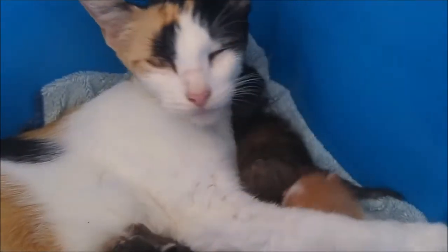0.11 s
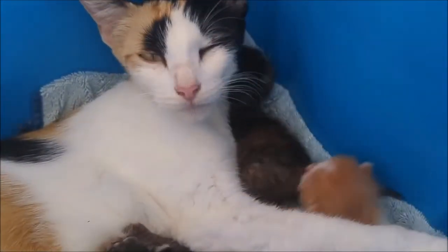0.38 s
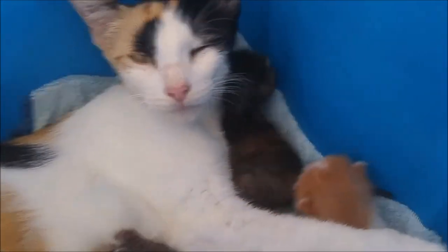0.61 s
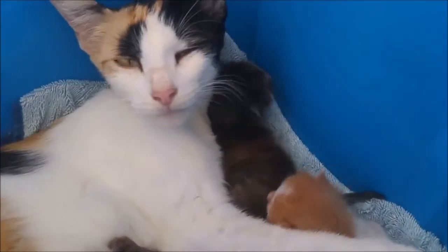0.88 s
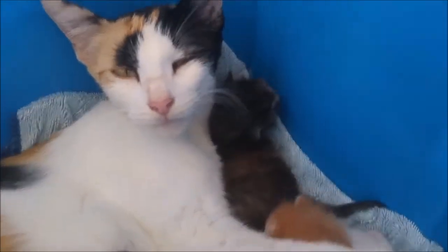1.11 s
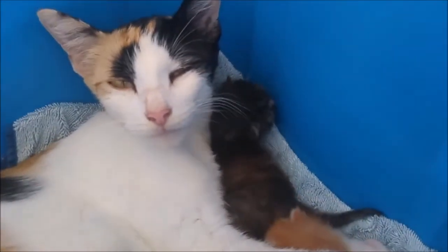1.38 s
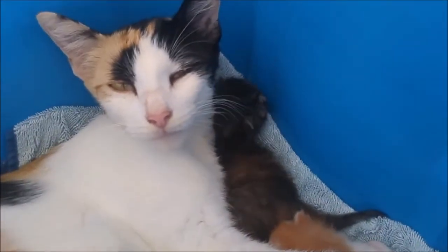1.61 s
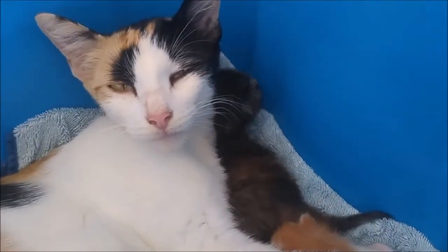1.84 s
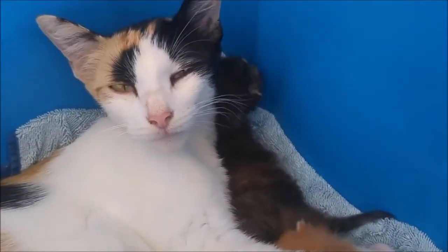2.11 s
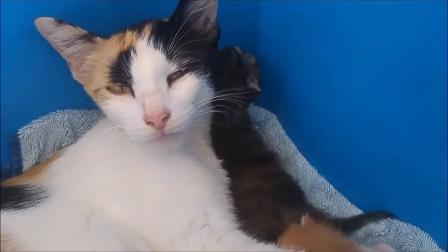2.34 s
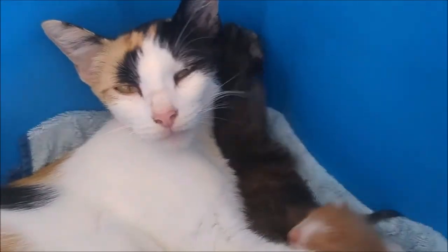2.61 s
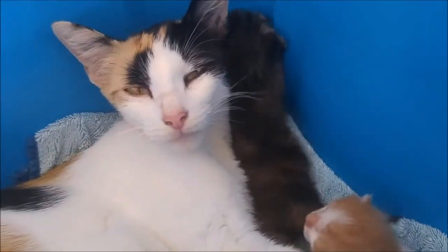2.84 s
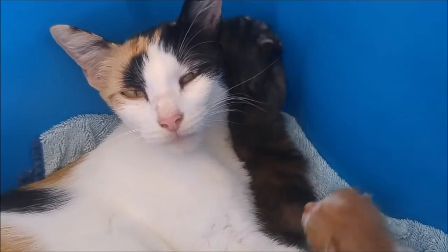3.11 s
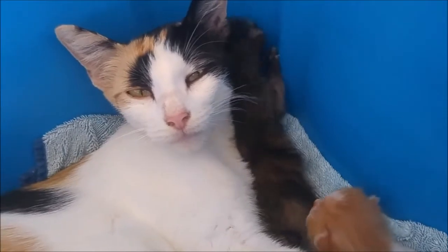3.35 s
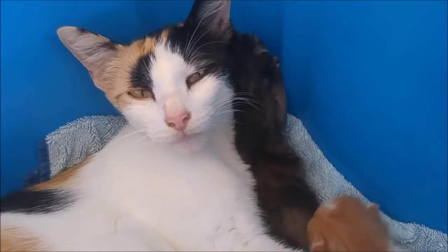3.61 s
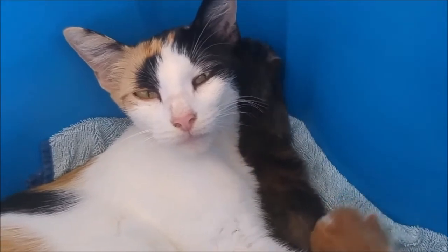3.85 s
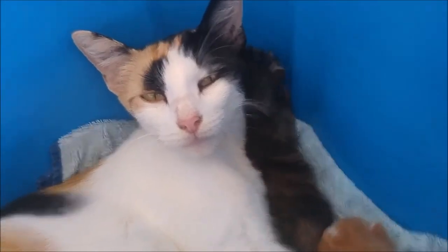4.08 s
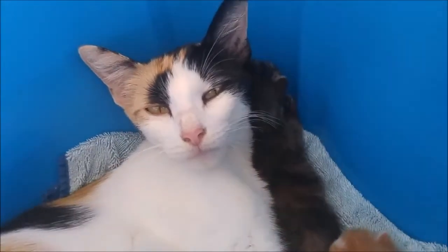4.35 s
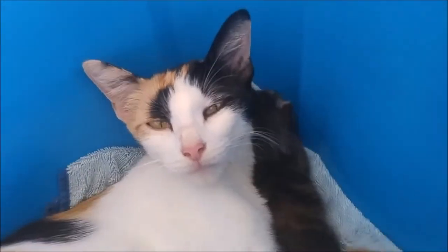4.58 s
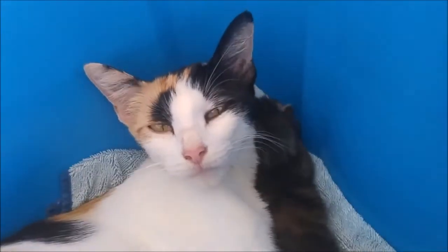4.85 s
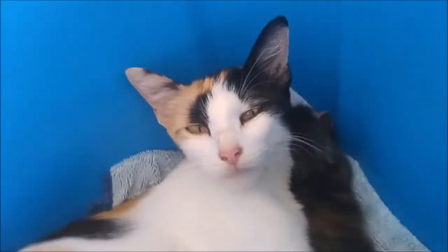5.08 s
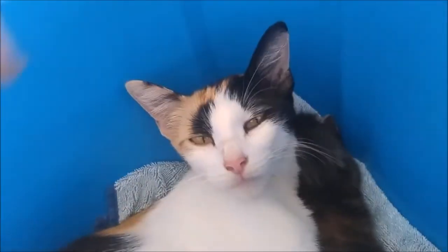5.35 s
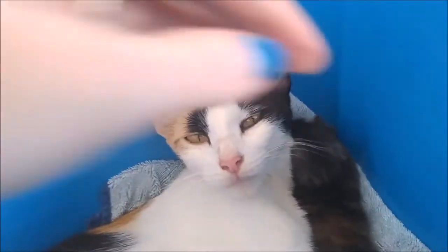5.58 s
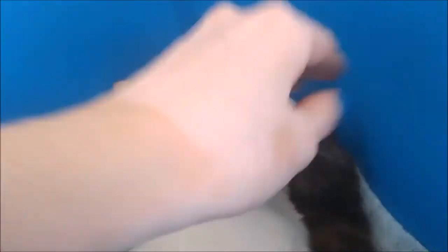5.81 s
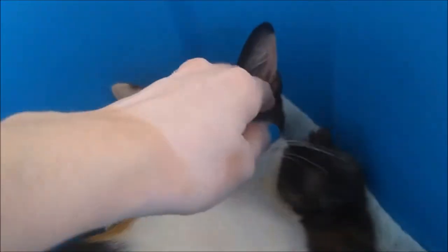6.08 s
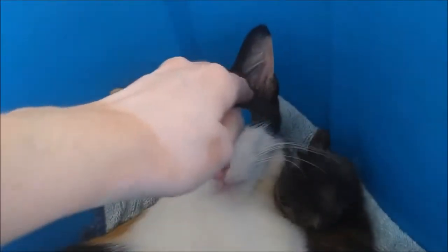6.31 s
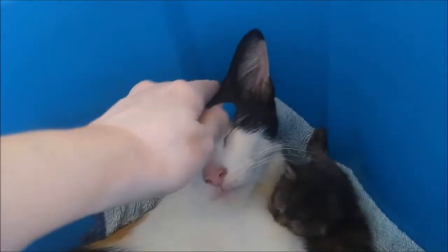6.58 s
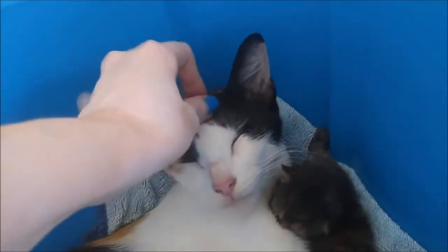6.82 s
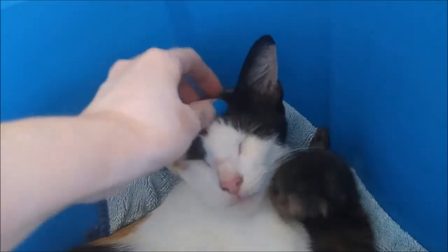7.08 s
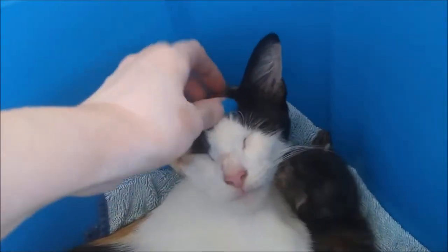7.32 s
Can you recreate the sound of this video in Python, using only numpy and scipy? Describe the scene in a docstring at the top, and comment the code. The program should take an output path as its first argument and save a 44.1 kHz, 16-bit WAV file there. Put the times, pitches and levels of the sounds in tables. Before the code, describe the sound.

A heavy engine outside starts quietly, climbs in pitch and swells into a throbbing, purr-like roar with airy hiss, one sharp plastic click midway.

```python
"""A heavy engine outside pulls away, heard by a small mono microphone in a plastic box. Its low orders are
sines that throb like a purr; its turbine whine is narrow noise that climbs in pitch. Shaped noise makes the
swelling rumble, roar, hiss and room tone; one engine order booms for a while in the room, and thin faint tones
come and go. Plastic clicks ring as decaying modes close by, fingers brush as faint puffs of high noise, and now
and then the treble drops out for a moment."""
import sys
import numpy as np
from scipy import signal
from scipy.fft import rfft, irfft
from scipy.io import wavfile
from scipy.ndimage import uniform_filter1d

SR = 44100
rng = np.random.default_rng(int(sys.argv[2]) if len(sys.argv) > 2 else 0)


def waveform_to_disk(signal):
    """Save audio, clipped to [-1, 1], as 16-bit WAV at the path in sys.argv[1]."""
    frames = np.transpose(np.atleast_2d(signal))
    scaled = np.clip(frames, -1, 1) * 32767
    samples = np.round(scaled).astype(np.int16)
    wavfile.write(sys.argv[1], SR, samples)


def natural_amplitude(level_db):
    """Convert a level in decibels to a linear amplitude factor, elementwise."""
    exponent = np.asarray(level_db, float) / 20
    return 10 ** exponent


N = 328104  # samples in the scene


def evened(x):
    """Scales a sound to rms 1."""
    return x / np.sqrt(np.mean(x ** 2) + 1e-20)


def curves(rows):
    """Draws every column of a table sample by sample over its first column, the time in seconds."""
    seconds, *columns = np.transpose(rows)
    return [np.interp(np.arange(N) / SR, seconds, column) for column in columns]


def add(mix, start_s, sound):
    """Lays a sound into the mix at start_s."""
    part = mix[round(start_s * SR):][:len(sound)]
    part += sound[:len(part)]


def noise(spectrum, patchy_db, grainy_db=2.5, gusty_db=0.57):
    """Random short-time spectra with drifting patches, narrow streaks and a flutter shared by all pitches."""
    bin_hz = np.fft.rfftfreq(2048, 1 / SR)
    real, imag, patches, streaks = rng.standard_normal((N // 512 + 5, 1025, 4)).T
    gusts = evened(uniform_filter1d(patches[0], size=5))
    # smoothed across (bins, frames)
    patches = evened(uniform_filter1d(patches, size=24, axis=0))
    patches = evened(uniform_filter1d(patches, size=8, axis=1))
    streaks = evened(uniform_filter1d(streaks, size=3, axis=0))
    streaks = evened(uniform_filter1d(streaks, size=6, axis=1))
    hz, db = np.transpose(spectrum)
    colour_db = np.interp(np.log(bin_hz + 1), np.log(hz + 1), db)[:, None]
    field_db = patchy_db * patches + grainy_db * streaks + gusty_db * gusts
    frames = (real + 1j * imag) * natural_amplitude(colour_db + field_db)
    return evened(signal.istft(frames, nperseg=2048, noverlap=1536)[1][:N])


def fuzzy(hz, width_hz):
    """Noise narrowed by two equal poles, each width_hz wide, carried along the pitch curve hz; rms 1."""
    pole = np.exp(-np.pi * width_hz / SR)
    z = rng.standard_normal(len(hz)) + 1j * rng.standard_normal(len(hz))
    z = signal.lfilter([1], np.convolve([1, -pole], [1, -pole]), z)
    return evened((z * np.exp(2j * np.pi * np.cumsum(hz) / SR)).real)


def fading(per_s, count):
    """Slow complex chance of rms 1: many reflected paths that drift in and out of step."""
    knots = np.arange(0, N + SR, 441)  # one every 0.01 s
    z = rng.standard_normal((count, len(knots))) + 1j * rng.standard_normal((count, len(knots)))
    slowness = np.exp(-(np.fft.fftfreq(len(knots), .01) / per_s) ** 2)
    z = np.fft.ifft(np.fft.fft(z) * slowness)
    z /= np.sqrt(np.mean(abs(z) ** 2))
    t = np.arange(N)
    return [np.interp(t, knots, v.real) + 1j * np.interp(t, knots, v.imag) for v in z]


def room_lift(hz):
    """Amplitude gain of the room, which swells an order while its pitch sweeps through a low resonance."""
    # Each row: frequency in Hz, half width in Hz, lift in dB
    modes = [(131.4, 3.82, 23.5), (299.4, 4, 6)]
    power = sum(natural_amplitude(db) ** 2 / (1 + ((hz - f) / w) ** 2) ** 2 for f, w, db in modes)
    return np.sqrt(1 + power)


def swell_db(order):
    """Flat-topped stretches in which one order stands out or sinks."""
    # Each row: multiple of the engine cycle, middle in seconds, half length in seconds, lift in dB
    swells = [(16, 1.65, .14, 21), (14, 3.96, .42, 14.5), (16, 4.55, 0.21, 7), (14, 4.95, 0.32, 11.5),
              (12, 5.65, 0.43, 10), (16, 7.06, 0.42, 5), (12, 3.75, 0.27, 7.5), (16, 3.7, .55, -4.5)]
    t = np.arange(N) / SR
    return sum(db * np.exp(-((t - s) / half) ** 4) for k, s, half, db in swells if round(k) == order)


def engine(roar_db):
    """Sines on multiples of the engine cycle: strong ones waver a little, weak ones fade by chance."""
    # Engine speed. Each row: time in seconds, cycle rate in Hz
    speed = [(0, 7.7), (.7, 7.7), (.92, 8.15), (1.17, 9.64), (1.4, 10.6), (1.7, 11.0), (2.0, 11.38),
             (2.6, 11.6), (3.2, 11.96), (3.8, 12.2), (4.4, 12.35), (5.0, 12.49), (5.6, 12.56), (6.5, 12.48),
             (7.44, 12.61)]
    # Throb. Each row: time in seconds, firing tone level in dB, base level of the strong higher orders in dB
    throb = [(0, -60.5, -74), (.75, -60, -65), (.92, -51, -48.5), (1.04, -61, -58.5), (1.2, -53, -45),
             (1.65, -48, -54.5), (2.15, -53, -42.5), (2.55, -29, -47.5), (2.9, -27, -43), (3.3, -30, -42),
             (3.55, -33, -41), (4.3, -24, -37.5), (4.6, -28, -35.5), (4.85, -47, -41), (5.2, -49, -50),
             (5.42, -38.5, -41.5), (5.9, -36.5, -39.5), (7.0, -28, -36.5), (7.44, -31.5, -36.5)]
    # Strong higher orders. Each row: multiple of the cycle, level relative to that base in dB
    steady = [(10, -8), (12, -9), (14, -8.5), (16, -2.5), (24, -11.5)]
    # Weak orders, which follow the roar. Each row: multiple of the cycle, relative level in dB
    weak = [(5, -25), (6, -13.5), (7, -26), (9, -9.5), (13, -16), (18, -13), (19, -10), (20, -29),
            (21, -18), (22, -11), (23, -19.5), (25, -16), (26, -25.5), (27, -15.5), (28, -16.5), (29, -20),
            (30, -22), (31, -18), (32, -34), (33, -18.5), (34, -18), (35, -28), (36, -16.5), (37, -16.5)]
    firing_order, weak_db = 8, 5
    waver, wavers_per_s, fades_per_s = 0.26, 4, 1.34  # waver: share of chance in the strong orders

    cycle_hz = curves(speed)[0]
    firing_db, upper_db = curves(throb)
    turns = 2 * np.pi * np.cumsum(cycle_hz) / SR
    first, *wavers = fading(wavers_per_s, count=len(steady) + 1)
    strong = natural_amplitude(firing_db) * ((1 + waver / 2 * first) * np.exp(1j * firing_order * turns)).real
    for (k, db), z in zip(steady, wavers):
        order = round(k)
        tone = (1 + waver * z) * np.exp(1j * order * turns + 2j * np.pi * rng.random())
        strong += natural_amplitude(upper_db + db + swell_db(order)) * room_lift(order * cycle_hz) * tone.real

    faint = np.zeros(N)
    for (k, db), z in zip(weak, fading(fades_per_s, count=len(weak))):
        faint += natural_amplitude(db) * (z * np.exp(1j * round(k) * turns)).real
    return np.sqrt(2) * strong + natural_amplitude(roar_db + weak_db) * faint


def street(roar_db, body_db, hiss_db):
    """Five ranges of shaped noise; four ride their own level curves, the highest air follows roar and hiss."""
    # Spectra. Each row: frequency in Hz, relative density in dB per Hz
    rumble = [(15, -34), (30, -30), (45, -36), (60, 0), (78, -1), (95, -20), (160, -60), (400, -120)]
    roar = [(40, -62), (70, -30), (100, 0), (137, 0.5), (300, -6.5), (419, -2.5), (472, -11.5), (539, -15),
            (600, -43), (780, -66), (1320, -120)]
    body = [(300, -28), (520, -6), (700, 2.5), (800, -3.5), (950, -6), (1200, -14), (1500, -19),
            (2400, -44), (5280, -120)]
    hiss = [(500, -50), (900, -3), (1450, -0.5), (2050, -0.5), (2800, 0), (3380, -2.5), (4300, -4),
            (5150, -2.5), (6000, -2.5), (6700, -3), (7390, -1.5), (8300, -1), (9600, -3.5), (10800, -20.5),
            (12500, -27), (15600, -50)]
    air = [(7000, -17), (10000, -23), (11500, -3.5), (13000, -5), (15600, -11), (20000, -22)]
    # Deep rumble. Each row: time in seconds, level in dB
    rumble_level = [(0, -58), (.7, -62), (1.7, -45), (2.2, -57), (2.5, -46), (3.1, -41), (3.75, -38),
                    (4.35, -37), (4.65, -42), (5.1, -46), (6.1, -44), (6.5, -58), (7.44, -48)]
    air_db = .35 * roar_db + .65 * hiss_db - 22  # air follows partly the roar, partly the hiss
    out = natural_amplitude(curves(rumble_level)[0]) * noise(rumble, patchy_db=3.0)
    out += natural_amplitude(roar_db) * noise(roar, patchy_db=0.5)
    out += natural_amplitude(body_db) * noise(body, patchy_db=1.74)
    out += natural_amplitude(hiss_db) * noise(hiss, patchy_db=0.73, grainy_db=2.0, gusty_db=0.7)
    out += natural_amplitude(air_db) * noise(air, patchy_db=1.0, grainy_db=0.0, gusty_db=2.0)
    return out


def room_tone():
    """Room tone and microphone noise: one shaped noise at a constant level."""
    # Each row: frequency in Hz, relative density in dB per Hz
    quiet = [(15, -47), (25, -30), (96, 6), (434, -9), (583, -12), (704, -15.5), (1540, -19), (1860, -24),
             (2930, -12.5), (3740, -26), (5030, -33), (5600, -34), (8850, -17), (11600, -34.5),
             (15600, -40)]
    return natural_amplitude(-51) * noise(quiet, patchy_db=.6, grainy_db=1.5, gusty_db=.3)


def whine():
    """A fuzzy whistle on the turbine's blade tone, with a wide skirt of turbulence around it."""
    # Each row: time in seconds, pitch in Hz, level of the narrow core in dB, level of the wide skirt in dB
    glide = [(1.3, 5900, -100, -100), (1.55, 6716, -56, -62), (1.7, 7000, -43, -52), (1.87, 7330, -55, -62),
             (2.4, 8750, -52.5, -66), (3.1, 9670, -46.5, -55), (3.45, 10130, -54, -57),
             (4.0, 10440, -55, -53), (4.65, 10530, -53, -46), (5.6, 10580, -58, -45),
             (6.1, 10510, -53.5, -45.5), (6.5, 10400, -64.5, -49.5), (7.44, 10250, -64.5, -49)]
    hz, core_db, skirt_db = curves(glide)
    core = natural_amplitude(core_db) * fuzzy(hz, width_hz=230)
    skirt = natural_amplitude(skirt_db) * fuzzy(hz, width_hz=800)
    return core + skirt


def thin_tones():
    """Faint wavering lines, very narrow noise, that come and go in the middle range."""
    # Each row: start in seconds, end in seconds, pitch in Hz, level in dB
    lines = [(1.505, 1.651, 1456, -53), (1.815, 1.999, 1450, -54.5), (2.437, 2.694, 990, -48.5),
             (2.7, 3.0, 1493, -52), (3.799, 4.251, 2340, -49.5), (4.39, 5.0, 1479, -49.5),
             (4.698, 5.098, 941, -50), (4.866, 4.93, 1140, -49), (5.407, 6.401, 703, -45.5),
             (5.495, 6.299, 1397, -53), (5.494, 6.302, 2750, -56)]
    out = np.zeros(N)
    for start, end, hz, db in lines:
        size = round((end - start) * SR)
        line = fuzzy(np.full(N // 4, hz), width_hz=22)[-size:]  # the settled end of a longer tone
        add(out, start, natural_amplitude(db) * line * signal.windows.tukey(size, .4))
    return out


def brushes():
    """Faint brushes of skin: short soft puffs of the highest hiss."""
    # Each row: start in seconds, length in seconds, level in dB
    puffs = [(2.78, .03, -66), (4.24, 0.087, -64), (4.317, .006, -42), (4.818, .06, -39),
             (5.09, 0.054, -49), (5.3, .03, -56), (5.35, 0.037, -56)]
    out = np.zeros(N)
    high = signal.butter(4, 11300, "highpass", fs=SR, output="sos")
    for s, length, db in puffs:
        puff = signal.sosfilt(high, rng.standard_normal(4000))[:round(length * SR)]
        add(out, s, natural_amplitude(db) * evened(puff) * signal.windows.tukey(len(puff), .6))
    return out


def boom():
    """The engine's eleventh order, swelling as its pitch crosses the room's boom near 132 Hz: one low sine that
    swells and goes."""
    # Each row: time in seconds, pitch in Hz, level in dB rms
    hum = [(3.0, 131.5, -70), (3.3, 132, -40), (3.55, 132, -35), (3.8, 128.5, -36), (4.1, 131, -36),
           (4.3, 131, -70)]
    hz, db = curves(hum)
    return np.sqrt(2) * natural_amplitude(db) * np.sin(2 * np.pi * np.cumsum(hz) / SR)


def clicks():
    """Each click rings the short modes of the plastic; the low modes take a moment to build."""
    # Each row: start in seconds, level in dB
    hits = [(4.893, -18), (5.045, -27), (5.106, -17), (5.2466, -1), (5.296, -17)]
    # Each row: mode frequency in Hz, relative level in dB, time to decay by 60 dB in seconds
    plastic = [(1200, 1.5, 0.0094), (1990, -3, 0.006), (3400, -8.5, 0.0047), (3940, 1, 0.0014),
               (5360, 9, 0.00085), (7000, -10, .0016), (8900, -16, .0025)]
    t = np.arange(1500) / SR
    ring = np.zeros(len(t))
    for hz, db, t60 in plastic:
        build = 1 - np.exp(-t * hz * 0.59)
        ring += natural_amplitude(db - 60 * t / t60) * build * np.sin(2 * np.pi * hz * t)
    out = np.zeros(N)
    for s, db in hits:
        add(out, s, natural_amplitude(db) * ring)
    return out


def scene():
    """Engine, street noise in five ranges, room tone and the small close sounds, alike on both channels."""
    # Each row: time in seconds, low roar level in dB, middle roar level in dB, hiss level in dB
    passing = [(0, -60, -61, -58.5), (.6, -66, -62.5, -59), (.9, -57, -58.5, -52), (1.15, -53, -56.5, -50),
               (1.7, -49, -53.5, -44.5), (2.4, -47.5, -49, -43.5), (2.65, -44, -42.5, -40),
               (3.5, -44, -43.5, -38), (3.75, -41, -42, -36), (4.4, -34, -40, -35.5),
               (5.1, -33.5, -40.5, -36.5), (5.7, -35.5, -42, -38.5), (6.2, -35.5, -40.5, -38.5),
               (6.8, -37, -44, -40.5), (7.44, -39.5, -47.5, -42.5)]
    roar_db, body_db, hiss_db = curves(passing)
    mono = engine(roar_db) + street(roar_db, body_db, hiss_db) + room_tone()
    mono += whine() + thin_tones() + brushes() + boom() + clicks()
    return np.array([mono, mono])


def coloured(x):
    """Gentle resonances of box and pickup, narrow dark gaps in the response, and its upper band limit."""
    # Each row: frequency in Hz, half width in Hz, lift in dB
    bumps = [(2880, 89, 3.5), (4390, 124, 3.5), (5174, 90, 3.5), (7330, 220, 3.5), (8330, 130, 2.5),
             (9170, 86, 2.5)]
    # Each row: frequency in Hz, half width in Hz, depth in dB
    notches = [(40, 8, 8), (545, 40, 14), (600, 15, 14), (1865, 40, 18), (2478, 22, 18), (3350, 150, 4),
               (7780, 120, 6)]
    top_hz = 15650
    hz = np.fft.rfftfreq(len(x), 1 / SR)
    colour_db = sum(db / (1 + ((hz - f) / w) ** 2) for f, w, db in bumps)
    colour_db -= sum(db / (1 + ((hz - f) / w) ** 2) for f, w, db in notches)
    limit = np.clip((top_hz + 60 - hz) / 60, 0, 1)
    return irfft(rfft(x) * natural_amplitude(colour_db) * limit, len(x))


def dropouts(x):
    """In each dip the treble fades out and in, and only its few strongest partials sound on as thin tones."""
    # Each row: centre in seconds, length at full depth in seconds
    dips = [(.752, .02), (1.297, 0), (1.425, .001), (2.683, 0), (3.644, 0), (3.836, .001), (4.112, .001),
            (4.924, 0), (4.966, .001), (5.072, 0), (5.19, .02), (5.52, .001), (5.563, 0), (5.691, 0),
            (5.99, .001), (6.054, 0), (6.203, 0), (6.695, .001), (6.844, 0), (6.929, 0), (6.971, 0)]
    above_hz, ramp_s, partials = 770, .014, 4
    hz = np.fft.rfftfreq(len(x), 1 / SR)
    treble = irfft(rfft(x) / (1 + (above_hz / (hz + 1)) ** 12), len(x))
    out, span = x.copy(), np.arange(-1024, 1024)
    away_s = abs(span) / SR  # distance from the centre
    for s, deep_s in dips:
        piece = treble[round(s * SR) + span]
        bins = rfft(piece * np.hanning(len(span)))
        peaks = signal.find_peaks(abs(bins), distance=20)[0]
        kept = peaks[np.argsort(abs(bins[peaks]))[-partials:]]
        tones = 3.37 * irfft(bins * np.isin(np.arange(len(bins)), kept), len(span))
        gone = .96 * np.clip(1 - (away_s - deep_s / 2) / ramp_s, 0, 1)
        linger = np.exp(-(away_s / (deep_s / 2 + ramp_s)) ** 4)  # fades the tones in and out
        add(out, (round(s * SR) - 1024) / SR, linger * tones - gone * piece)
    return out


def band_limit(x):
    """A steep low-pass at the top of the band."""
    return signal.sosfilt(signal.butter(12, 15720, fs=SR, output="sos"), x)


def record(dry):
    """One microphone on both channels: its colour, then the treble dropouts."""
    mono = dropouts(coloured(dry[0]))
    return band_limit(np.array([mono, mono]))


dry = scene()
out = record(dry)
waveform_to_disk(out)
```